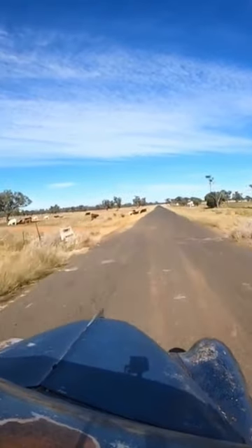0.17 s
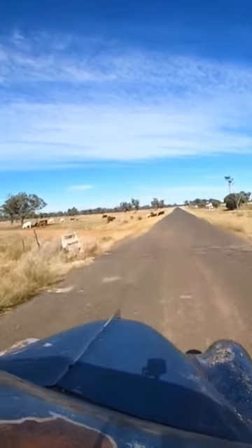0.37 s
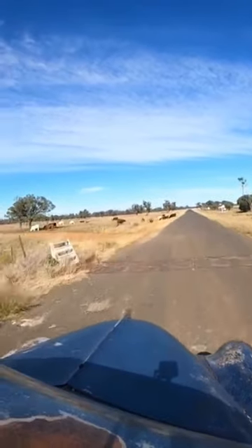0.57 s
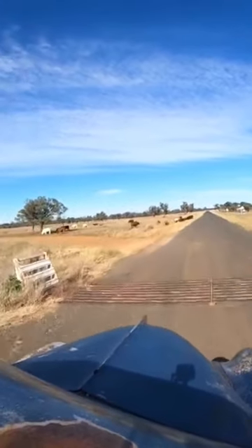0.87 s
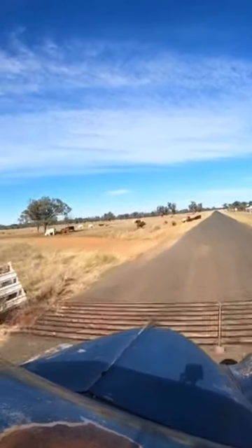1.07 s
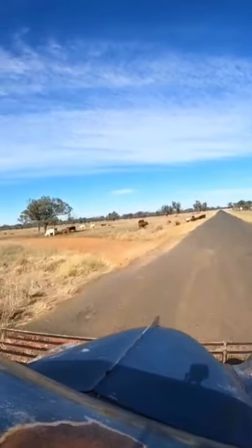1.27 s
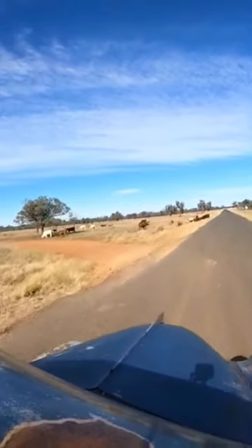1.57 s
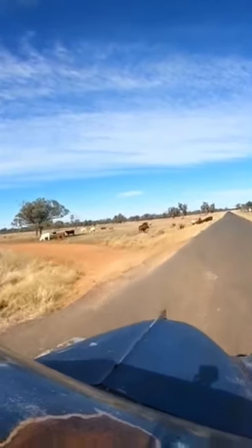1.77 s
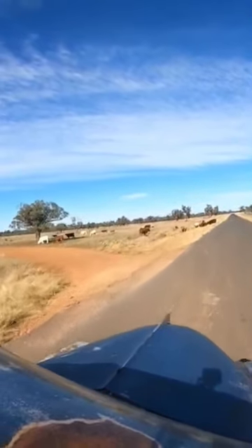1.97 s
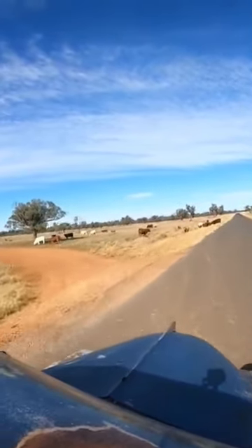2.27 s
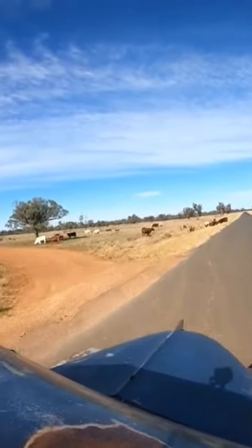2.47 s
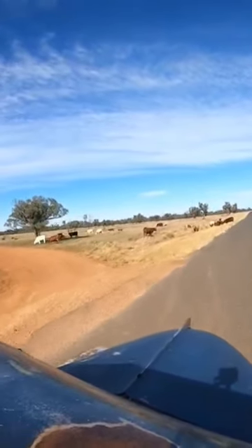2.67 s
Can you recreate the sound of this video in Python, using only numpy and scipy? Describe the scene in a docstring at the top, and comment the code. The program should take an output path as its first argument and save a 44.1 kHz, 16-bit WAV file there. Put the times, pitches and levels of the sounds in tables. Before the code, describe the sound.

An old car drones along a sealed rural road with loose ticks, hits a small bump, then bangs and rattles over a steel cattle grid, two axles in succession, before the drone returns; body-mounted microphone, briefly choking.

```python
"""Car over a cattle grid

An old car rolls along a sealed country road and crosses a steel cattle grid, heard from a small camera on its body.
Engine orders, coloured noise and a thin whine make the drone; a loose part ticks and grit flicks on the panels.
A bump, then each axle on the bars, shakes thuds and rattle out of noise; tyre thumps, bar clangs and chimes
are struck modes. At listed jolts the microphone chokes for a moment."""
import sys
import numpy as np
from scipy import signal
from scipy.fft import rfft, irfft
from scipy.io import wavfile
from scipy.ndimage import uniform_filter1d

SR = 44100
rng = np.random.default_rng(int(sys.argv[2]) if len(sys.argv) > 2 else 0)


def level_to_linear(level):
    """Convert decibel levels to linear amplitude factors, elementwise."""
    exponent = np.asarray(level, float) / 20
    return 10 ** exponent


def materialize(psi):
    """Save the field psi as 16-bit PCM at rate SR to the path in sys.argv[1].

    A 1-D psi becomes a single channel; in a 2-D psi each row is a channel.
    """
    bounded = np.clip(np.atleast_2d(psi).T, -1, 1)
    quanta = np.round(bounded * 32767).astype(np.int16)
    wavfile.write(sys.argv[1], SR, quanta)


N = 123921


def curve(rows):
    """Columns of a table, joined linearly in time."""
    time_s, *columns = np.transpose(rows)
    return [np.interp(np.arange(N) / SR, time_s, column) for column in columns]


def rms_one(x):
    """Scale to rms 1."""
    return x / np.sqrt(np.mean(x ** 2) + 1e-20)


def drift(rate_hz):
    """Slow chance with spread 1: noise through a double pole, made at SR / 40."""
    pole = np.exp(-80 * np.pi * rate_hz / SR)
    noise = rng.standard_normal(N // 40 + 2002)
    slow = signal.lfilter([1], [1, -2 * pole, pole * pole], noise)[2000:]
    return np.interp(np.arange(N) / 40, np.arange(len(slow)), rms_one(slow))


def ring(clicks, hz, t60_s):
    """Clicks set one damped mode ringing: a two-pole resonator."""
    radius = level_to_linear(-60 / (max(t60_s, .002) * SR))
    angle = 2 * np.pi * hz / SR
    feedback = [1, -2 * radius * np.cos(angle), radius * radius]
    return signal.lfilter([0, np.sin(angle)], feedback, clicks + 1e-18)


def colour(x, spectrum):
    """Give a signal a spectrum, joined over log frequency; rms 1."""
    hz, db = np.transpose(spectrum)
    bin_hz = np.arange(N // 2 + 1) * SR / N + 1
    gain_db = np.interp(np.log(bin_hz), np.log(hz), db, left=-90, right=-120)
    return rms_one(irfft(rfft(x) * level_to_linear(gain_db), N))


def strike(events, modes, cut_hz):
    """Each blow, a click with a rough after-contact, excites every mode with a strength of its own."""
    contact_s, contact_rough, scatter_db = .0025, .075, 1.5
    time_s, db = np.transpose(events)
    scatter = scatter_db * rng.standard_normal((len(time_s), len(modes)))
    length = SR // 100
    decay = np.exp(-np.arange(length) / SR / contact_s)
    contacts = contact_rough * rng.standard_normal((len(time_s), length)) * decay
    contacts[:, 0] = 1
    out = 0
    for k, (hz, mode_db, t60_s) in enumerate(modes):
        clicks = np.zeros(N)
        for at, gain, contact in zip(time_s, level_to_linear(db + mode_db + scatter[:, k]), contacts):
            clicks[int(at * SR):][:length] += gain * contact
        out = out + (-1) ** k * ring(clicks, hz, t60_s)  # modes alternate in sign
    return signal.sosfilt(signal.butter(4, cut_hz, fs=SR, output="sos"), out)


# drone of engine and road: (time [s], base level [dB], fifth order [dB], sixth order [dB])
DRONE_LEVELS = [(0, -53.5, -26.5, -31.5), (.6, -53, -21.5, -20), (.95, -55, -20.5, -29),
                (1.4, -53, -23, -21.5), (2.0, -55, -36, -24.5), (2.2, -62, -36.5, -34.5),
                (2.45, -60, -27, -21), (2.81, -53.5, -26.5, -29)]
# panel roar spectrum: (frequency [Hz], relative density [dB])
ROAR_SPECTRUM = [(14, -6.5), (33, 2.5), (70, -5.5), (118, -3.5), (250, -8.5), (540, -29.5), (660, -47.5),
                 (1200, -44.5), (1900, -53.5), (2200, -64), (3200, -60.5), (4400, -69), (6000, -67),
                 (15000, -85)]


def engine_orders(fifth_db, sixth_db):
    """Sines at 1, 5 and 6 times a wavering crank rate."""
    crank_hz, crank_db, pitch_waver, order_waver_db = 21.38, -19.5, .035, 3.0
    crank_phase = 2 * np.pi * np.cumsum(crank_hz * (1 + pitch_waver * drift(6.0))) / SR
    out = np.zeros(N)
    for order, rms_db, waver in [(1, crank_db, .5), (5, fifth_db, 1), (6, sixth_db, 1)]:
        level = level_to_linear(rms_db + waver * order_waver_db * drift(16.0))
        out += level * np.sqrt(2) * np.sin(order * crank_phase + rng.uniform(0, 2 * np.pi))
    return out


def panel_roar():
    """Lumpy noise coloured by the panels."""
    return colour(rng.standard_normal(N) * level_to_linear(1.5 * drift(34.0)), ROAR_SPECTRUM)


def thin_whine():
    """Noise through two equal resonators, wavering in level."""
    whine_hz, width_hz = 5220, 320
    t60_s = np.log(1000) / np.pi / width_hz
    once = ring(rng.standard_normal(N), whine_hz, t60_s)
    return rms_one(ring(once, whine_hz, t60_s)) * level_to_linear(2.8 * drift(30.0))


def drone():
    """Engine orders over roar and whine, which share the base level."""
    roar_over_base_db, whine_over_base_db = 37.5, -16
    base_db, fifth_db, sixth_db = curve(DRONE_LEVELS)
    noise = level_to_linear(roar_over_base_db) * panel_roar() + level_to_linear(whine_over_base_db) * thin_whine()
    return engine_orders(fifth_db, sixth_db) + level_to_linear(base_db) * noise


# ticks of a loose part: (time [s], level [dB])
TICK_EVENTS = [(0.0892, -32.5), (0.2393, -29), (0.354, -24), (0.633, -30), (0.7503, -24), (0.783, -40),
               (0.8008, -24), (0.846, -25.5), (0.9464, -42), (1.0992, -36), (1.3643, -42), (1.5392, -20)]
# modes of the loose part: (frequency [Hz], level [dB], t60 [s])
TICK_PART_MODES = [(1500, -8, .003), (2500, -9, .003), (3200, -4, .007)]


def loose_part_ticks():
    """Listed ticks and faint chance ones before the grid strike short modes."""
    faint_count, faint_db = 8, -43
    faint = [(s, faint_db) for s in rng.uniform(0, GRID_SHAKING[0][0], faint_count)]
    return strike(TICK_EVENTS + faint, TICK_PART_MODES, 5700)


# grit flicks on the panels: (time [s], level [dB], pitch [Hz])
GRIT_FLICKS = [(0.45, -47, 10780), (0.736, -41.5, 8740), (.7503, -44, 6940), (2.058, -45, 7650),
               (2.138, -44.5, 6000), (2.161, -48, 6040)]


def grit():
    """Short decaying noise puffs, each in a band round its own pitch."""
    decay_s = .0064
    out = np.zeros(N + SR)
    t = np.arange(SR // 20) / SR
    for time_s, db, hz in GRIT_FLICKS:
        band = signal.butter(2, [hz * 0.42, min(hz * 1.2, 16000)], "band", fs=SR, output="sos")
        puff = rng.standard_normal(len(t)) * np.exp(-t / decay_s)
        out[int(time_s * SR):][:len(t)] += level_to_linear(db) * signal.sosfilt(band, puff)
    return out[:N]


# shaking on a bump in the road: (time [s], thud [dB], rattle [dB])
BUMP_SHAKING = [(.70, -35, -97), (.735, -22, -48.5), (.79, -15, -56), (.86, -37, -78.5)]
# shaking under each axle on the grid: (time [s], thud [dB], rattle [dB])
GRID_SHAKING = [(1.43, -50, -92), (1.46, -23.5, -52.5), (1.495, -11, -47.5), (1.58, -9.5, -45),
                (1.69, -11.5, -44), (1.73, -13, -58.5), (1.75, -23, -64), (1.82, -19, -56.5),
                (1.88, -18, -46.5), (1.92, -19, -45), (1.99, -17.5, -44), (2.02, -20, -51.5),
                (2.1, -29.5, -70.5), (2.19, -52, -85.5)]
# thud spectrum: (frequency [Hz], relative density [dB])
THUD_SPECTRUM = [(50, -22), (90, -8.5), (150, 2), (250, -0.5), (400, -8.5), (650, -20), (1200, -30),
                 (2500, -45)]
# rattle spectrum: (frequency [Hz], relative density [dB])
RATTLE_SPECTRUM = [(900, -11.5), (3000, -4), (4500, -7), (6400, -6), (10000, -13.5), (15800, -22)]
# modes ringing in the rattle: (frequency [Hz], level [dB], t60 [s])
RATTLE_MODES = [(10300, -15, .012), (14700, -20.5, .015)]


def panel_thud():
    """Tyre thuds in the panels: lumpy low noise."""
    return colour(rng.standard_normal(N) * level_to_linear(3.36 * drift(40.0)), THUD_SPECTRUM)


def metal_rattle():
    """Dense chance clicks of loose metal, spread into noise puffs and ringing modes."""
    clicks_per_s, puff_samples, steady_noise = 790, 60, 0.34
    sizes = level_to_linear(3.0 * np.minimum(rng.exponential(1, N), 4)) * rng.choice([-1, 1], N)
    clicks = rms_one(sizes * (rng.random(N) < clicks_per_s / SR))
    puffs = uniform_filter1d(np.abs(clicks), size=puff_samples) * rng.standard_normal(N)
    rattle = colour(rms_one(puffs) + steady_noise * rng.standard_normal(N), RATTLE_SPECTRUM)
    for hz, db, t60_s in RATTLE_MODES:
        rattle = rattle + level_to_linear(db) * rms_one(ring(clicks, hz, t60_s))
    return rattle


def shaking():
    """Thud and rattle follow the bump and the axles."""
    thud_db, rattle_db = curve(BUMP_SHAKING + GRID_SHAKING)
    return level_to_linear(thud_db) * panel_thud() + level_to_linear(rattle_db + 1.5 * drift(45.0)) * metal_rattle()


# tyres thump on the bump and the bars: (time [s], level [dB])
THUMP_EVENTS = [(.764, 1), (1.449, -1.5), (1.487, 0), (1.522, -2), (1.567, -2.5), (1.594, -4.5),
                (1.803, -10.5), (1.929, -3), (1.978, -10.5), (2.033, -9.5)]
# low thump modes: (frequency [Hz], level [dB], t60 [s])
TYRE_MODES = [(129.6, -1.5, 0.083), (210, -7.5, 0.084)]


def tyre_thumps():
    """Blows on two low modes."""
    return strike(THUMP_EVENTS, TYRE_MODES, 600)


# tyres clang on the bars: (time [s], level [dB])
CLANG_EVENTS = [(1.502, -34), (1.520, -31), (1.5675, -24), (1.572, -10), (1.5915, -12.5), (1.600, -25),
                (1.619, -18), (1.643, -17.5), (1.667, -27.5), (1.688, -23), (1.723, -29), (1.767, -40),
                (1.812, -33), (1.856, -30), (1.920, -29.5), (1.959, -30), (1.993, -30)]
# bar modes: (frequency [Hz], level [dB], t60 [s])
CLANG_MODES = [(1250, -6, .008), (1900, -7, .008), (2500, -5, .012), (3100, -11, .005)]


def bar_clangs():
    """Blows on short modes of the steel bars."""
    return strike(CLANG_EVENTS, CLANG_MODES, 5300)


# a loose steel part chimes under the rear axle: (time [s], level [dB])
CHIME_EVENTS = [(1.918, -48), (1.99, -52.5)]
# chime mode: (frequency [Hz], level [dB], t60 [s])
STEEL_PART_MODES = [(3780, 0, .2)]


def steel_chimes():
    """Blows on one longer-ringing mode."""
    return strike(CHIME_EVENTS, STEEL_PART_MODES, 6000)


def scene():
    """Both channels carry nearly the same sound; faint delayed copies, one of them treble only, make the side
    signal."""
    side_db, side_treble_db = -39.5, -23
    mid = drone() + loose_part_ticks() + grit() + shaking()
    mid = mid + tyre_thumps() + bar_clangs() + steel_chimes()
    treble = signal.sosfilt(signal.butter(2, 4000, "high", fs=SR, output="sos"), mid)
    side = level_to_linear(side_db) * np.roll(mid, 150) + level_to_linear(side_treble_db) * np.roll(treble, 9)  # delays [samples]
    return np.array([mid + side, mid - side])


# the microphone chokes: (start [s], length [s], membrane swing [1])
CHOKE_EVENTS = [(1.472, 0.005, -0.71), (1.506, 0.013, -0.48), (1.55, 0.0086, -0.02), (1.654, 0.0055, 0.2),
                (1.772, 0.0079, -0.13), (1.792, 0.0078, -0.25), (1.862, 0.01, -.37), (1.962, 0.0095, -0.13),
                (2.112, .011, -0.36), (2.172, 0.012, -0.35)]


def choked_microphone(dry):
    """While choked the membrane swings aside and the output settles to silence."""
    close_s, reopen_s, rise_s, settle_s = .004, .0015, .003, .004
    t = np.arange(N) / SR
    openness, swing = np.ones(N), np.zeros(N)
    for start_s, length_s, depth in CHOKE_EVENTS:
        closing = (start_s + close_s - t) / close_s
        reopening = (t - start_s - length_s) / reopen_s
        openness *= np.clip(np.maximum(closing, reopening), 0, 1)
        rise = np.exp(-((t - start_s) / rise_s) ** 2)
        settle = np.exp(-(np.abs(t - start_s) / settle_s) ** 1.6)
        swing += depth * np.where(t < start_s, rise, settle)
    return dry * openness + swing


def low_pass(x):
    """Removes everything above the highest recorded frequency."""
    return signal.sosfilt(signal.butter(12, 15930, fs=SR, output="sos"), x)


def record(dry):
    """The microphone chokes, both ends fade briefly, peaks are rounded."""
    t, fade_s = np.arange(N) / SR, .004
    fade = np.clip(np.minimum(t, t[-1] - t) / fade_s, .1, 1)
    mix = np.tanh(choked_microphone(dry) * fade)
    return low_pass(mix)


dry = scene()
out = record(dry)
materialize(out)
```